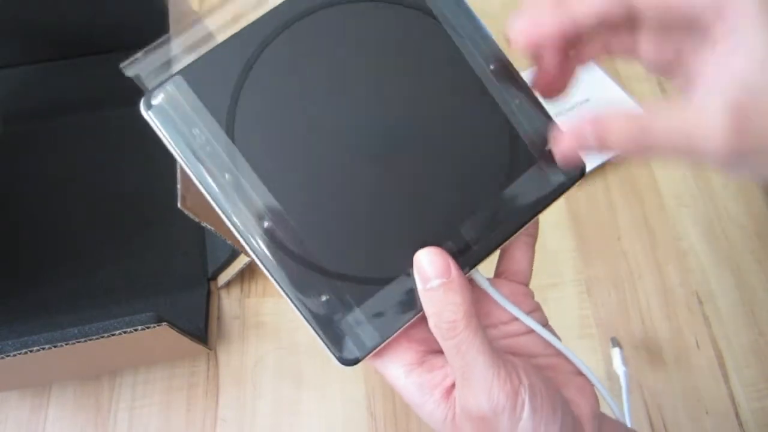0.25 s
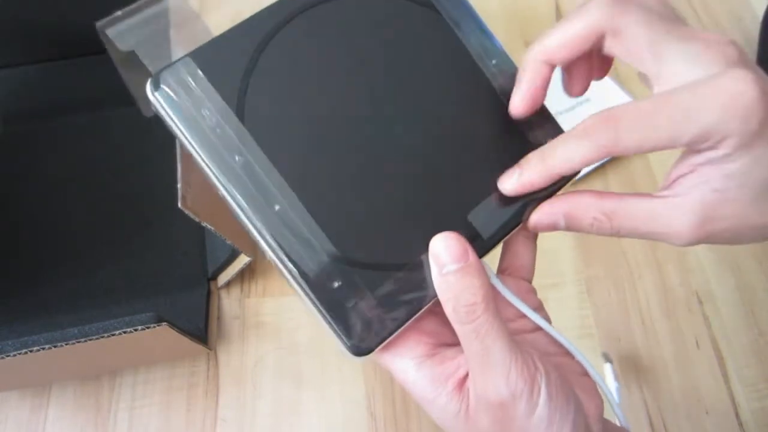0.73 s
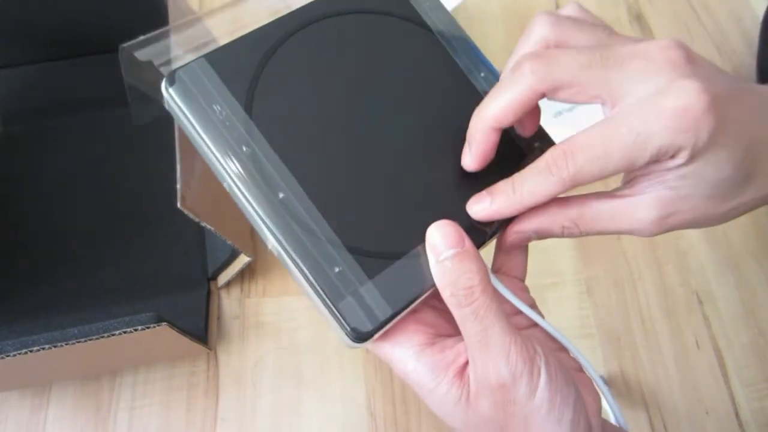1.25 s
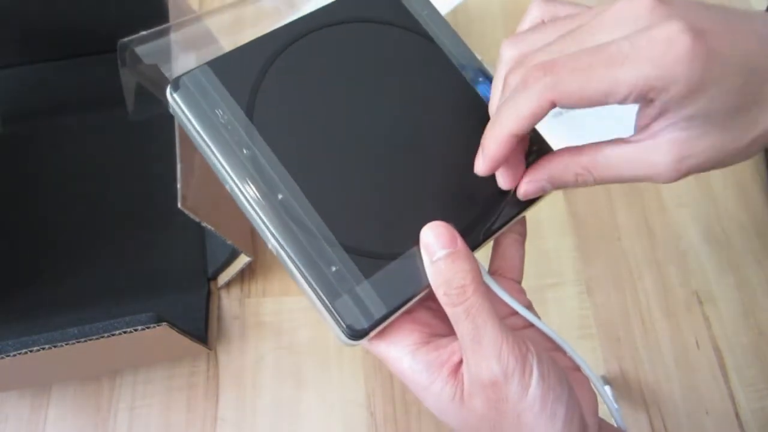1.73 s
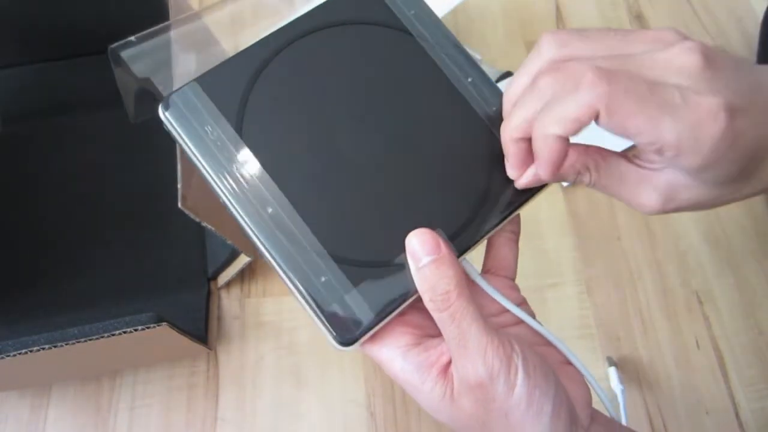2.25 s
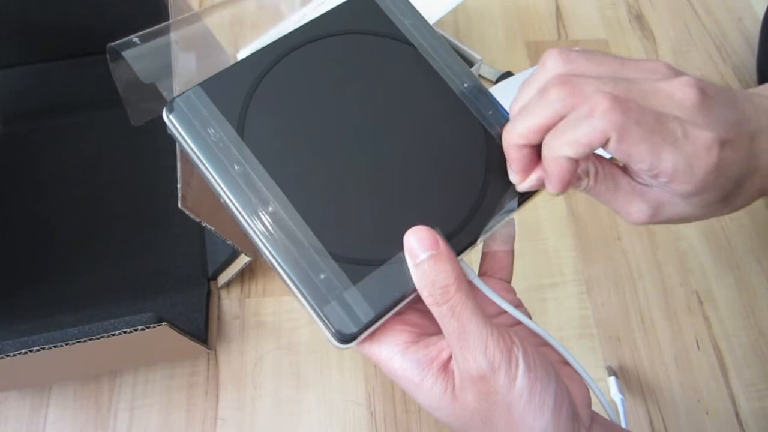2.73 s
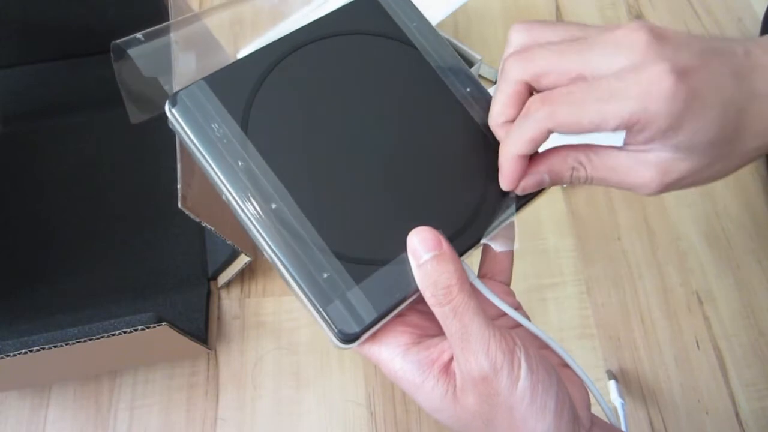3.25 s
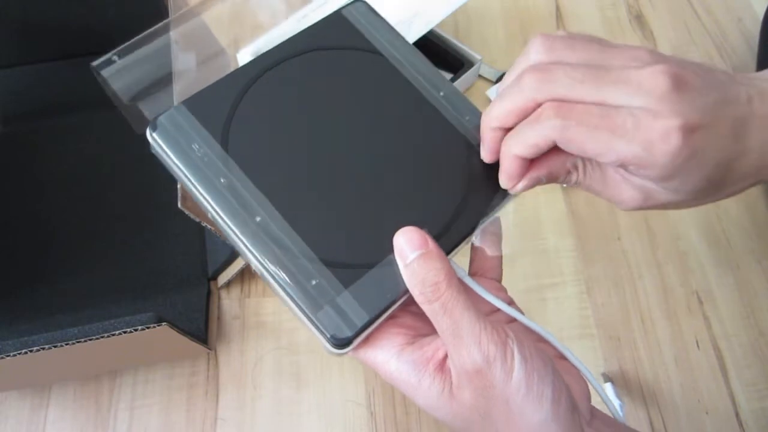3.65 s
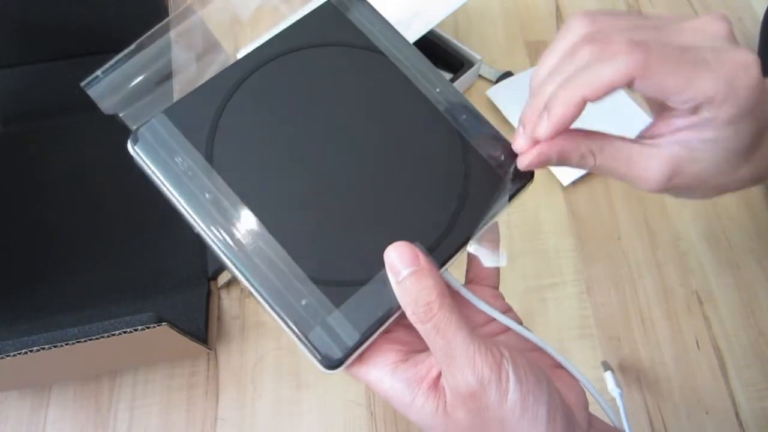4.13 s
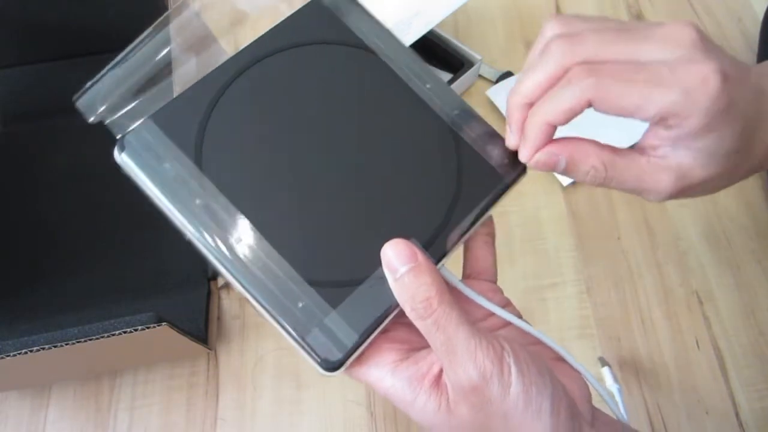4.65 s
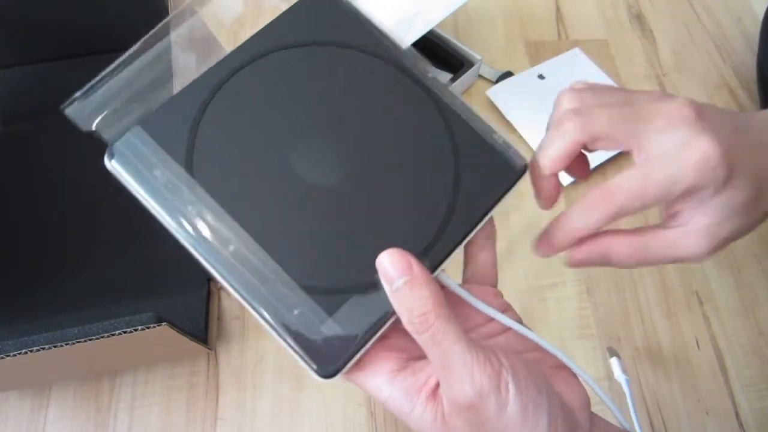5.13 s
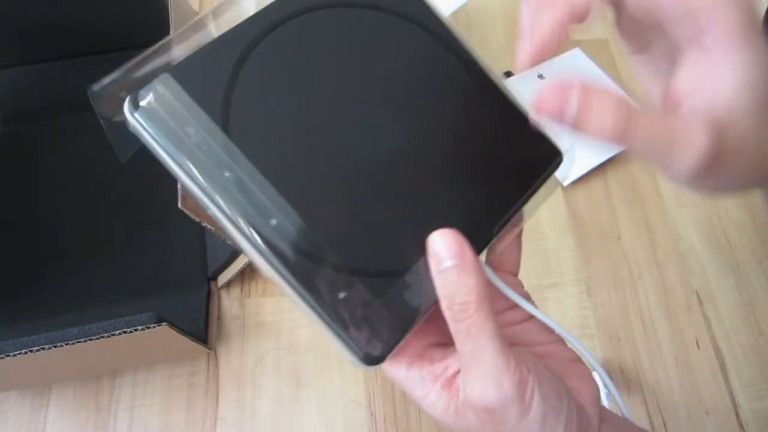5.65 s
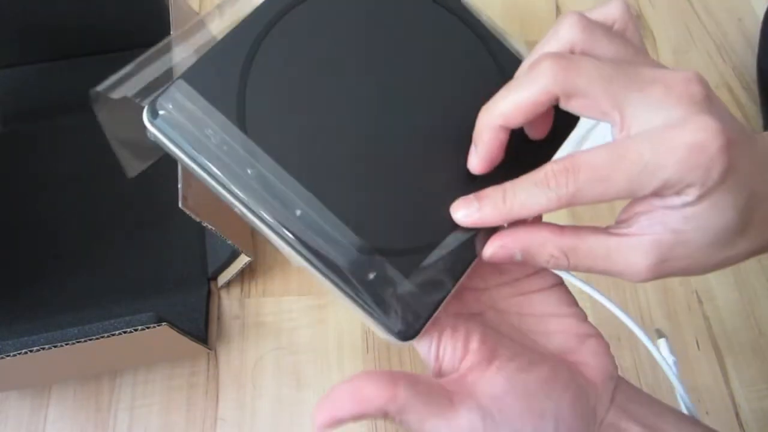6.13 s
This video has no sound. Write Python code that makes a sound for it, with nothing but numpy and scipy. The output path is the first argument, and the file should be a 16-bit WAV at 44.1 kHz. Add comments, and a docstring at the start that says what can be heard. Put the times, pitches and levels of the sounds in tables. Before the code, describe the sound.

In a small quiet room with an airy hush and a low electrical hum, thin protective film crackles as hands work it loose from a hollow plastic case. Sharp little snaps come singly and in clusters, with soft rubbing and a few nail flicks between them. A very brief squeak comes past the middle, then the densest run of crackles, then a final flick. The microphone is close, with the handling a little to the right.

```python
"""A quiet small room, airy hush and mains hum; close to a stereo microphone, a little to the right, hands
pick at thin plastic film on a hollow flat box. Fingertips rub from the start, and the film snaps as creases
flip, each snap knocking the case and echoing briefly. Near 1 s a nail first flicks a loose flap; near 4 s
a fingertip squeaks. The snaps crowd together around 5 s, and a last flick ends the picking."""
import sys
import numpy as np
from scipy import signal
from scipy.io import wavfile
from scipy.ndimage import uniform_filter1d

SR = 44100
rng = np.random.default_rng(int(sys.argv[2]) if len(sys.argv) > 2 else 0)


def waveform_to_disk(signal):
    """Save audio, clipped to [-1, 1], as 16-bit WAV at the path in sys.argv[1]."""
    frames = np.transpose(np.atleast_2d(signal))
    scaled = np.clip(frames, -1, 1) * 32767
    samples = np.round(scaled).astype(np.int16)
    wavfile.write(sys.argv[1], SR, samples)


N = 281799

# fingertip strokes: start/s, end/s, rub on the case/dB, film rustle/dB
STROKES = [(0, 0.105, -56.5, -61.5), (0.324, 0.442, -63, -76), (0.656, 0.834, -59.5, -57),
           (0.857, 0.9, -66, -62), (0.961, 1.035, -60.5, -70), (1.023, 1.19, -59, -59),
           (1.235, 1.296, -54, -68), (2.317, 2.455, -64, -82), (2.673, 2.83, -63, -100),
           (2.874, 2.98, -57, -66), (3.098, 3.325, -56, -63.5), (3.293, 3.49, -59.5, -91),
           (3.691, 3.772, -57.5, -79), (4.084, 4.125, -49.5, -53.5), (4.327, 4.404, -64.5, -83),
           (4.688, 4.807, -52, -52), (5.094, 5.213, -62, -59), (5.277, 5.434, -64, -96),
           (5.785, 5.939, -58, -59.5), (5.974, 6.065, -67, -62.5), (6.079, 6.13, -64.5, -60.5),
           (6.125, 6.212, -54.5, -58)]


def gain_of(db):
    """Decibels to a factor."""
    return 10 ** (np.asarray(db) / 20)


def unit_rms(x):
    """Scales to rms 1."""
    return x / np.sqrt(np.mean(x ** 2) + 1e-20)


def unit_peak(x):
    """Scales to peak 1."""
    return x / np.abs(x).max()


def curve_at(points, hz):
    """Reads a table on a log-frequency axis."""
    f, value = np.transpose(points)
    return np.interp(np.log(hz + 1), np.log(f + 1), value)


def band(x, lo_hz, hi_hz):
    """Causal band-pass."""
    sos = signal.butter(4, [lo_hz, min(hi_hz, .49 * SR)], "band", fs=SR, output="sos")
    return signal.sosfilt(sos, x)


def mode(t, hz, t60):
    """One dying vibration."""
    return gain_of(-60 * t / t60) * np.sin(2 * np.pi * hz * t)


def response(points):
    """Minimum-phase impulse response of a table of f/Hz, level/dB."""
    log_gain = np.log(gain_of(curve_at(points, np.abs(np.fft.fftfreq(8192, 1 / SR)))))
    return np.fft.ifft(np.exp(np.conj(signal.hilbert(log_gain)))).real[:2048]


def hush(level_db=-59):
    """Room tone: wide air noise with faint drifting patches."""
    # spectrum of the air: f/Hz, relative level/dB
    spectrum = [(25, 7), (80, 10.5), (200, 3.5), (500, 1.5), (1300, -5), (2500, -12.5), (4000, -19),
                (9000, -24), (15600, -26), (15900, -61)]
    # likeness of left and right: f/Hz, correlation
    likeness = [(60, -0.46), (180, -0.63), (550, -0.68), (1650, -0.55), (4970, -0.15), (15000, 0.45)]
    frames, hz = N // 256 + 5, np.fft.rfftfreq(1024, 1 / SR)
    a, b, c, d, patches = rng.standard_normal((frames, 513, 5)).T
    patches = unit_rms(uniform_filter1d(uniform_filter1d(patches, 12, 0), 14, 1))
    patch_db = 1.8 * np.clip(hz / 600, 0, 1)[:, None] * patches
    same = np.clip(curve_at(likeness, hz), -1, 1)[:, None]
    left = a + 1j * b
    right = same * left + np.sqrt(1 - same ** 2) * (c + 1j * d)
    bins = np.array([left, right]) * gain_of(curve_at(spectrum, hz)[:, None] + patch_db)
    air = signal.istft(bins, nperseg=1024, noverlap=768)[1][:, :N]
    return gain_of(level_db) * air / np.sqrt(np.mean(air.mean(0) ** 2))


def hum(hz=121.9, level_db=-56):
    """Mains hum, reaching the two sides of the microphone at different phases."""
    phase = 2 * np.pi * hz * np.arange(N) / SR
    return gain_of(level_db) * np.sin(phase + np.array([[.9], [-.9]]))


def grit(per_s, spread_db):
    """Dense tiny slips of uneven size."""
    size = gain_of(spread_db * np.minimum(rng.exponential(1, N), 4))
    return size * (rng.random(N) < per_s / SR) * rng.choice([-1., 1.], N)


def rub():
    """Skin slips over the case and sounds its hollow; the film rustles; each stroke swells and fades."""
    # hollow of the case under the finger: f/Hz, width/Hz, level/dB
    resonances = [(640, 520, -5), (1280, 300, 5), (1880, 1100, -2), (2680, 1200, -36)]
    t = np.arange(N) / SR
    press = np.zeros((2, N))
    for start, end, case_db, film_db in STROKES:
        swell = np.sin(np.pi * np.clip((t - start) / (end - start), 0, 1))
        press += gain_of([[case_db], [film_db]]) * swell
    hollow = sum(gain_of(db) * width * mode(t[:1024], hz, t60=np.log(1000) / np.pi / width)
                 for hz, width, db in resonances)
    grip = unit_rms(uniform_filter1d(uniform_filter1d(rng.standard_normal(N), 300), 300))
    skin = signal.oaconvolve(grit(per_s=3000, spread_db=4), hollow)[:N]
    skin = unit_rms(band(skin, 320, 13500))
    film = unit_rms(band(grit(per_s=7000, spread_db=1), 2200, 13000))
    film = film + .26 * np.roll(film, 32)  # a bounce off the lid colours the rustle
    return gain_of(2 * grip) * (press[0] * skin + press[1] * film)


def ticks():
    """One faint, dull snap at a chance moment of each stroke, as rows for snaps()."""
    rows = []
    for (start, end, rub_db, _), (when, force, pitch, bright) in zip(
            STROKES, rng.random((len(STROKES), 4))):
        mean_db = rub_db + 15.5
        ring_db, knock_db = mean_db + 6 * (force - .5), mean_db - 10.5
        ring_hz, edge_hz = 1150 * (.86 + .568 * pitch), 6000
        bright_db = -26 + 14 * (bright - .5)
        rows.append((start + when * (end - start), ring_db, ring_hz, bright_db, edge_hz, knock_db))
    return rows


def snaps(lean_db=-3.5, edge_span=1.4):
    """A crease flips in a few tiny breaks that ring the air pocket under the film and knock the case."""
    # crease flips: t/s, pocket ring/dB, ring f/Hz, bright edge over ring/dB, edge f/Hz, case knock/dB
    creases = [(.026, -54, 700, -20, 6000, -42), (.09, -23, 760, -1.5, 9000, -26.5),
               (.3149, -45, 1150, 9, 8000, -45.5), (.5187, -34, 660, -2.5, 6500, -38.5),
               (.6815, -50, 650, 6, 5500, -42.5), (1.0661, -39.5, 690, 7, 8000, -47),
               (1.2382, -45.5, 1260, 1, 3000, -58.5), (1.2618, -40.5, 1280, -23, 3500, -64.5),
               (1.269, -25, 1140, 9, 6700, -49), (1.4034, -15, 1190, 12.5, 8890, -41.5),
               (1.5213, -36, 990, 7.5, 6600, -45.5), (1.538, -22, 1100, 4, 4500, -32),
               (1.5457, -25.5, 1670, 12, 6800, -56), (1.592, -32.5, 1125, -22, 5000, -41),
               (1.8466, -44, 2020, 13, 7200, -50), (1.8546, -34, 910, -25, 4500, -46),
               (1.8651, -17.5, 1130, -2.5, 7200, -36.5), (2.095, -37.5, 1257, -60, 3500, -52),
               (2.4896, -26.5, 1150, 1, 5000, -36.5), (2.5884, -34, 1290, -25, 3500, -54),
               (2.5923, -33.5, 1330, -44, 3500, -56.5), (2.8065, -36, 1110, -1.5, 4200, -54),
               (2.9271, -42.5, 1210, -3, 8500, -59), (2.9457, -28.5, 1270, 15, 7500, -67.5),
               (3.0083, -37.5, 885, -7.5, 4800, -49), (3.1554, -50, 1520, 0, 8000, -64),
               (3.4771, -43.5, 2550, 4, 8000, -56), (3.5296, -13.5, 707, 7.5, 6000, -29),
               (3.6857, -32.5, 1245, -15, 3500, -59), (3.6942, -35.5, 1170, 9, 4500, -69),
               (3.765, -43, 850, -26, 5000, -54), (3.8654, -33.5, 1120, 6.5, 3000, -56),
               (3.8688, -26.5, 1130, -3, 3200, -61), (3.9669, -29, 1200, -1.5, 3500, -44.5),
               (3.9883, -46, 1900, 14, 7000, -61), (4.046, -61, 700, 14, 6000, -41.5),
               (4.1104, -26, 1110, 5, 9000, -33), (4.2572, -43.5, 1130, -30.5, 5000, -50.5),
               (4.6363, -52, 1300, 21.5, 7000, -55.5), (4.6424, -43, 1370, 15, 8000, -61.5),
               (4.6575, -11.5, 1370, 8.5, 9570, -37), (4.7041, -18.5, 1190, 3, 5800, -26),
               (4.7304, -34.5, 1970, 13, 6500, -59), (4.7402, -18.5, 1070, -9.5, 3500, -30.5),
               (4.7487, -29.5, 604, 1, 5500, -23.5), (4.7881, -35.5, 1280, -44, 6500, -59),
               (5.0515, -42.5, 700, -16, 6000, -34), (5.0877, -25, 1100, -6.5, 4000, -36),
               (5.0935, -23, 1290, -23.5, 3800, -38.5), (5.1027, -26.5, 1220, 7, 5500, -29),
               (5.1417, -22.5, 734, 0, 5000, -33), (5.1511, -26.5, 1370, -17, 5000, -62),
               (5.1675, -30.5, 1590, -12, 6000, -31.5), (5.172, -27.5, 1090, -9, 4500, -34),
               (5.184, -46, 700, -8, 4500, -40.5), (5.7876, -40.5, 1250, -10, 7000, -43.5),
               (5.8339, -44.5, 650, 1, 7500, -35.5), (6.0705, -42, 1010, -16, 6000, -40.5),
               (6.1699, -38, 1250, 0, 7500, -43.5), (6.1915, -15.5, 1720, 6, 6300, -30.5)]
    # modes of the case: f/Hz, level/dB, t60/s
    case_modes = [(249, -13, .02), (370.5, 0.5, 0.054), (435.5, 3.5, 0.064), (615, 5, 0.032),
                  (691, 7.5, 0.01)]
    out, t = np.zeros((2, N + 2048)), np.arange(2048) / SR
    for s, ring_db, ring_hz, bright_db, edge_hz, knock_db in creases + ticks():
        break_ms = .79 * gain_of(-.41 * bright_db)  # brighter snaps break faster
        noise = rng.standard_normal(2048)
        sizes = noise * np.abs(noise)  # few large, many small
        breaks = .47 * sizes * np.exp(-1000 * t / max(break_ms, .05)) * min(break_ms, 1) ** 2
        breaks[0] = 1 / max(break_ms, 1)  # a quick break starts hardest
        pocket = mode(t, ring_hz, t60=.008 + .003 * min(break_ms, 3))
        ring = unit_peak(np.convolve(np.abs(breaks[:512]), pocket)[:2048])
        ring += 1.23 / max(break_ms, .8) * unit_peak(band(breaks, 608, 2794))  # slow breaks ring purer
        side_db = np.array([[.5], [-.5]]) * (lean_db + 1.02 * rng.standard_normal())
        case = sum(gain_of(db + 4.1 * rng.standard_normal()) * mode(t, hz, t60)
                   for hz, db, t60 in case_modes)
        edge = unit_peak(band(breaks, edge_hz / edge_span, edge_hz * edge_span))
        edge += gain_of(-7.5) * unit_peak(band(breaks, edge_hz, 18000))
        knock = gain_of(knock_db) * unit_peak(band(case, 220, 1300))
        crack = gain_of(ring_db - 2.5 + .23 * bright_db) * unit_peak(band(breaks, 1990, 5720))
        low = knock + gain_of(ring_db) * unit_peak(band(ring, 420, 9000))
        high = crack + gain_of(ring_db + bright_db) * unit_peak(edge)
        at = round(s * SR)
        # the hands are to the right, and the treble is the more directional
        out[:, at:at + 2048] += gain_of(.73 * side_db) * low + gain_of(side_db) * high
    return out[:, :N]


def flicks(flap_hz=3450, flap_t60=.0016):
    """A nail plucks a taut flap of film: a dull pop, then brighter clicks as it slaps back."""
    # plucks: t/s, pop f/Hz, pop level/dB, click level/dB
    plucks = [(0.8837, 1244, -30, -24), (1.0301, 1250, -31, -24), (2.5779, 1170, -35, -25.5),
              (5.7122, 1226, -27, -19), (6.3481, 1285, -20, -13)]
    # slaps after each pop: delay/ms, level/dB
    slaps = [(1.2, -6), (3.6, 2), (5.9, -32), (12.5, -15)]
    out, t = np.zeros(N + 2048), np.arange(2048) / SR
    for (s, hz, pop_db, click_db), detunes in zip(plucks, rng.normal(0, .17, (len(plucks), len(slaps)))):
        phase = 2 * np.pi * hz * t
        pop = (np.sin(phase) + .2 * np.sin(2 * phase)) / (1 + (t / .0021) ** 4)
        rasp = rng.standard_normal(2048) * gain_of(-60 * t / .148)  # the flap drags over the lid
        pop = band(pop + .57 * rasp, 469.4, 4305)
        clicks = sum(gain_of(db) * mode(np.maximum(t - ms / 1000, 0), flap_hz * (1 + detune), flap_t60)
                     for (ms, db), detune in zip(slaps, detunes))
        at = round(s * SR)
        out[at:at + 2048] += gain_of(pop_db) * pop + gain_of(click_db) * band(clicks, 1500, 4523)
    return out[:N]


def squeak():
    """A fingertip sticks and slips fast on the film: a gliding tone with overtones."""
    # course of the squeak: t/s, slip rate/Hz, level/dB
    glide = [(3.965, 1086, -40.5), (3.969, 2000, -35.5), (3.972, 2520, -38.5), (3.980, 1510, -41.5),
             (3.986, 1840, -32.5), (3.987, 2170, -43)]
    s, hz, db = np.transpose(glide)
    t = np.arange(N) / SR
    phase = 2 * np.pi * np.cumsum(np.interp(t, s, hz)) / SR
    tone = sum(size * np.sin(k * phase) for k, size in enumerate([1, .5, .062, .073], 1))
    return gain_of(np.interp(t, s, db)) * tone * ((t > s[0]) & (t < s[-1]))


def echo_shares(x, cycles_per_s=2.3):
    """Crossfades a sound among three sets of echoes, so their colour keeps changing."""
    phase = np.pi * cycles_per_s * np.arange(N) / SR
    return [x * np.sqrt(2 / 3) * np.abs(np.sin(phase + k * np.pi / 3)) for k in range(3)]


def early_echoes(x, scatter_db=-8, scatter_t60=.021):
    """Hands and box scatter the first milliseconds; single reflections lean to alternate sides."""
    # table top and walls: delay/ms, level/dB
    reflections = [(1.3, -53.5), (9.8, -21.5), (12.4, -24.5)]
    t = np.arange(600) / SR
    taps = rng.standard_normal((2, 600)) * gain_of(-60 * t / scatter_t60) * (t > .001)
    taps = band(taps + taps[::-1] / 2, 730, 17000)  # small objects scatter only short waves
    taps *= gain_of(scatter_db) / np.linalg.norm(taps[0])
    for k, (ms, db) in enumerate(reflections):
        taps[:, min(round(ms * SR / 1000), 599)] += gain_of(db + (-1) ** k * np.array([2., -2.]))
    return signal.oaconvolve(x, taps, axes=1)[:, :N]


def room(x, width=.33):
    """The small room's tail: sparse echoes after the first wall, each band dying at its own speed."""
    # sound sent into the room, less of the treble that beams at the microphone: f/Hz, level/dB
    send = [(300, -13.5), (1000, -9.5), (3000, -7.5), (6000, -11), (12000, -13.5)]
    # decay of the room: f/Hz, t60/s
    decay = [(250, 0.55), (700, 0.3), (1800, 0.33), (4600, 0.3), (10000, 0.3)]
    sent = signal.oaconvolve(x.mean(0), response(send))[:N]
    taps = np.zeros((2, SR // 2))
    slots = np.arange(400, SR // 2 - 12, 12)  # one echo in every 12 samples
    at = slots + rng.integers(0, 12, (2, len(slots)))
    np.put_along_axis(taps, at, rng.choice([-1., 1.], at.shape), 1)
    hz, t, bins = signal.stft(taps, SR, nperseg=256)
    bins *= gain_of(-60 * t / curve_at(decay, hz)[:, None])
    mid, side = signal.istft(bins, SR, nperseg=256)[1]
    tail = np.array([mid + width * side, mid - width * side]) / np.linalg.norm(mid)
    return signal.fftconvolve(sent[None], tail, axes=1)[:, :N]


def scene():
    """Close handling and its echoes over the room tone, all through the microphone's colour."""
    # microphone response: f/Hz, level/dB
    microphone = [(40, -10), (250, 3.5), (6000, 0), (8300, 1), (10500, -7.5), (12000, -22), (13000, -11.5),
                  (16000, -7)]
    to_right = gain_of([[-.7], [.7]])
    close = snaps() + (rub() + squeak() + flicks()) * to_right
    echoes = sum(early_echoes(x) + room(x) for x in echo_shares(close))
    air = close + echoes + hush() + hum()
    return signal.oaconvolve(air, response(microphone)[None], axes=1)[:, :N]


def record(dry, ceiling=.95, cutoff_hz=16800):
    """The recorder's input rounds off peaks above half its ceiling, then limits the band."""
    over = np.maximum(np.abs(dry) - ceiling / 2, 0)
    rounded = dry - np.sign(dry) * (over - ceiling / 2 * np.tanh(2 * over / ceiling))
    low_pass = signal.firwin(511, cutoff_hz, window=("kaiser", 9), fs=SR)
    return signal.oaconvolve(rounded, low_pass[None], "same")


dry = scene()
out = record(dry)
waveform_to_disk(out)
```